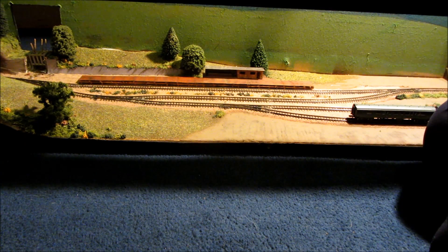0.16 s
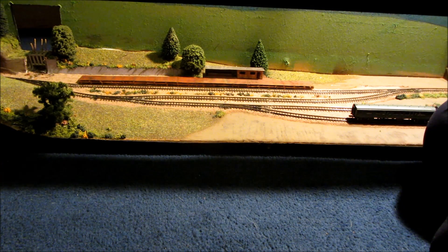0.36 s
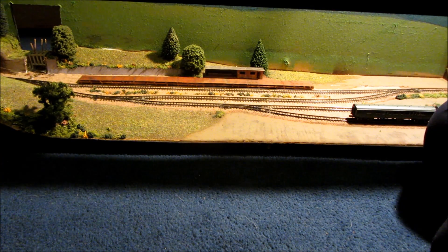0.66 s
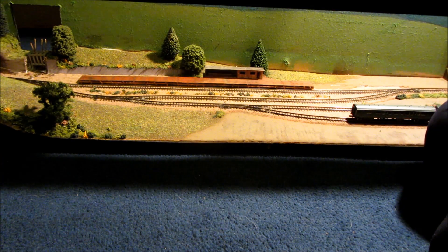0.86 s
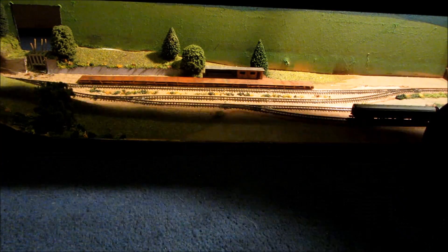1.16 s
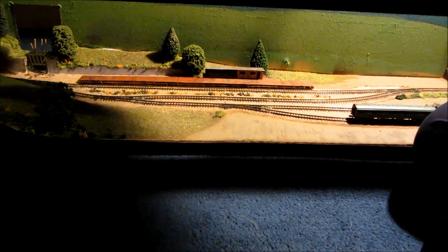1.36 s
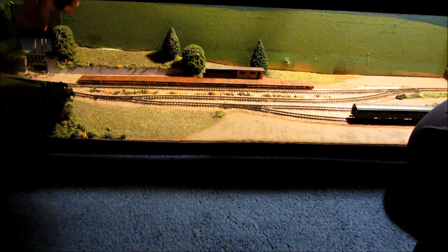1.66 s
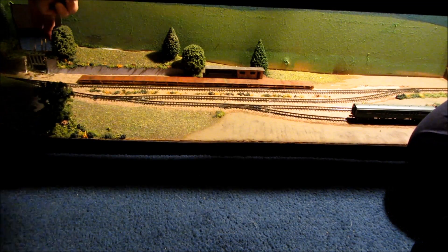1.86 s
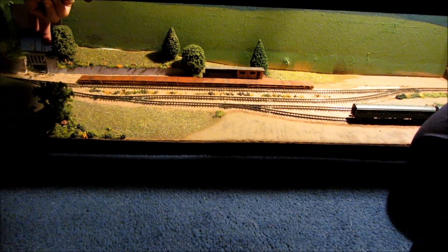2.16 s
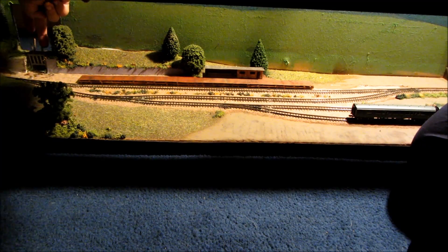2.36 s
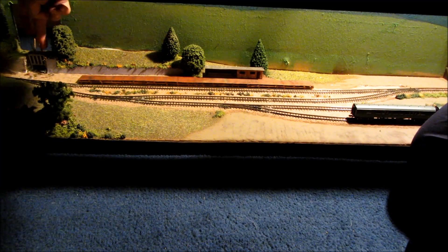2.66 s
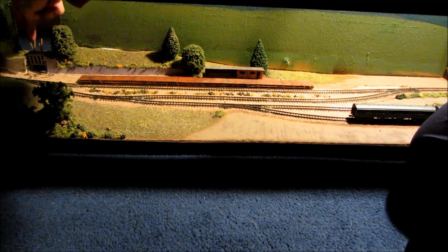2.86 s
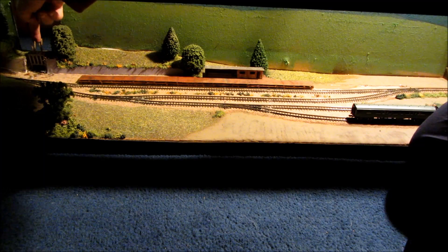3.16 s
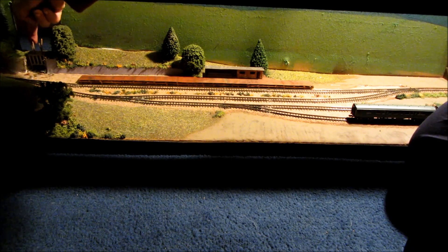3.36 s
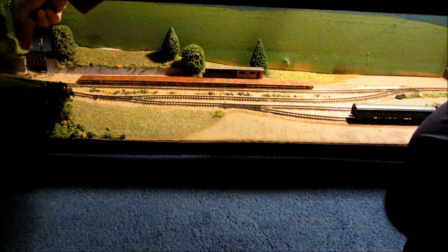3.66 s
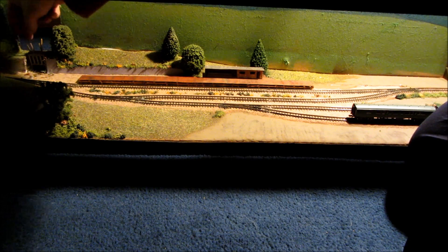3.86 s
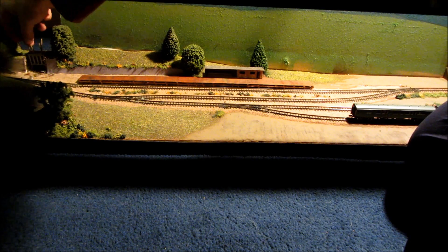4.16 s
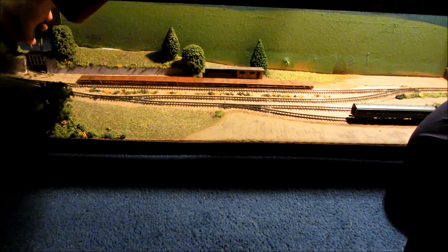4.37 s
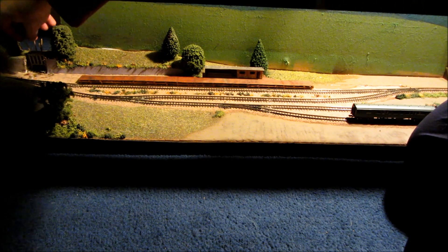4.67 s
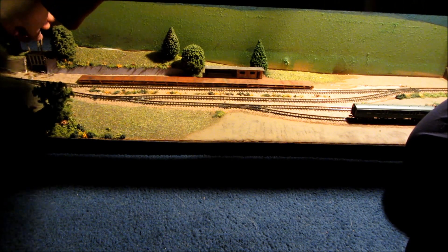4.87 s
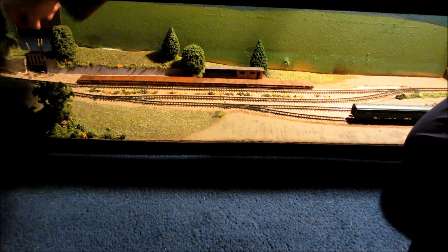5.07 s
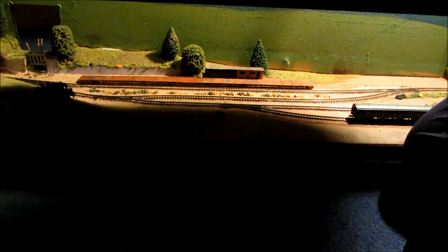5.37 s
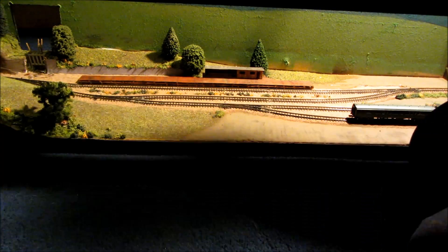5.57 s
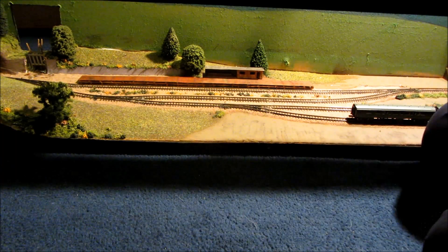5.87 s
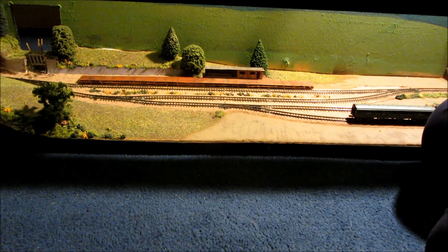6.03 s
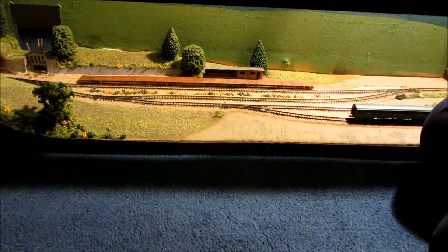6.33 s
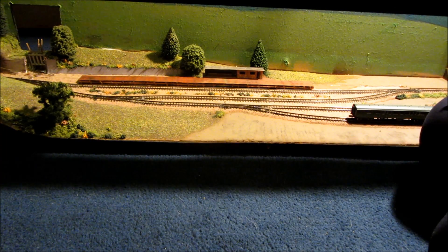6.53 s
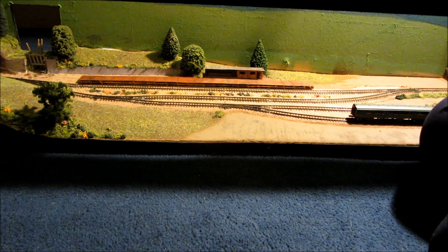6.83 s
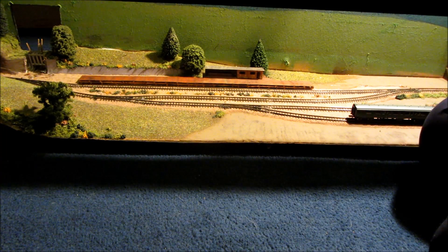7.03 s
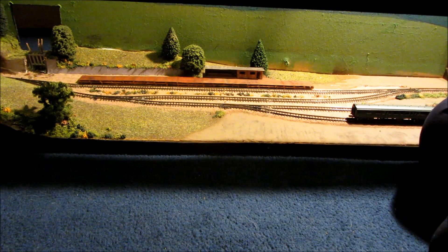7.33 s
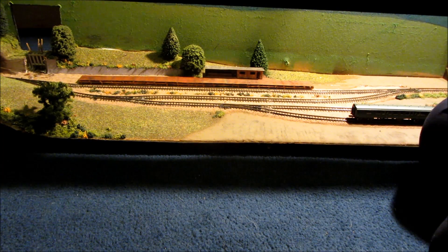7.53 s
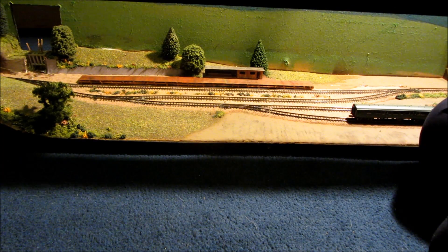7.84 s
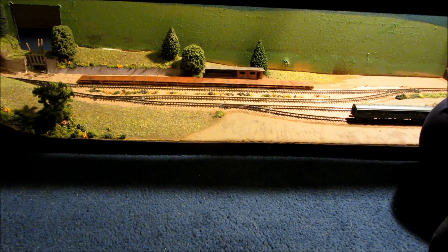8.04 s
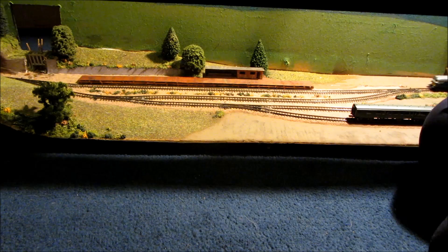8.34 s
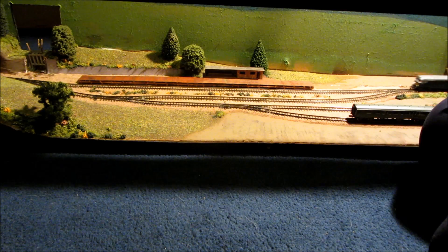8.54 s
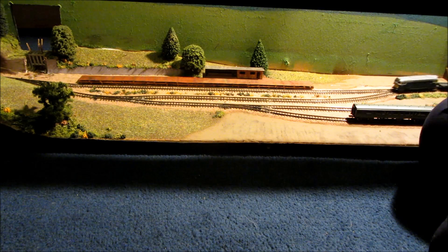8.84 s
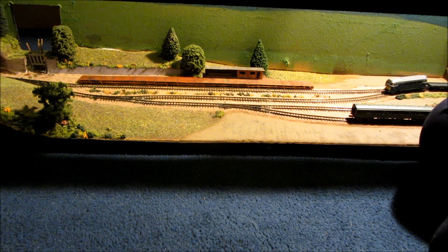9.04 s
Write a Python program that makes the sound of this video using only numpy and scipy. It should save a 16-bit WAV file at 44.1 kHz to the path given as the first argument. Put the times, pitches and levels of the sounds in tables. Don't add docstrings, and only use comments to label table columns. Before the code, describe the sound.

Close stereo pickup of a model railway on a hollow wooden board: brief whirring, clacking wheels slow and stop, followed by a dull knee bump and sleeve hiss. Irregular plastic clicks, squeaky finger rubs and light wooden knocks come next, then soft cloth movement. Near-silence with low hum is broken by a sharp double snap and chatter; finally the ticking motor and rough wheels return over the rail joints.

```python
import sys
import numpy as np
from scipy import signal
from scipy.fft import rfft, irfft, next_fast_len
from scipy.io import wavfile
from scipy.ndimage import uniform_filter1d

SR = 44100
rng = np.random.default_rng(int(sys.argv[2]) if len(sys.argv) > 2 else 0)


def log_audio(samples):
    frames = np.atleast_2d(samples).T
    limited = np.clip(frames, -1, 1)
    pcm = np.round(limited * 32767).astype(np.int16)
    wavfile.write(sys.argv[1], SR, pcm)


def voltage_ratio(decibels):
    exponent = np.asarray(decibels, float) / 20
    return 10 ** exponent


N = 405719

# f/Hz, density level/dB
AIR_SPECTRUM = [(20, -30), (60, -21.5), (95, -12), (125, -9.5), (155, -14), (190, -9), (230, -13),
                (400, -17.5), (700, -20), (1500, -27), (3300, -34), (4100, -39.5), (6000, -37),
                (9000, -43.5), (12500, -57), (15000, -55), (16400, -66)]
# f/Hz, rms level/dB
HUM_TONES = [
    (120, -46.5),
    (189, -59),
    (15735, -87.5),
]

# f/Hz, density level/dB
NYLON_SPECTRUM = [(3000, -30), (4200, -3), (5000, 3), (6200, 2.5), (8000, -2.5), (10000, -15), (13000, -24)]
# start t/s, peak t/s, end t/s, peak level/dB, crumpling over hiss/dB
SLEEVE_SLIDES = [
    (.49, 0.53, 0.59, -50, -1.5),
    (1.1, 1.368, 1.78, -70, 18),
    (1.004, 1.59, 2, -57, 7),
    (4.8, 5.2, 6.1, -70, 9),
    (5.607, 5.996, 6.26, -60.5, 7.5),
    (5.9, 6.205, 6.67, -60.5, 8),
]
# start t/s, peak t/s, end t/s, peak level/dB
TAUT_GLIDES = [
    (1.1, 1.5, 2.0, -64),
    (4.9, 5.197, 7, -70),
    (5.797, 5.92, 6.4, -59),
    (5.96, 5.99, 6.02, -52.5),
    (6.018, 6.047, 6.08, -56),
]
# t/s, thread rate f/Hz, level/dB
WEAVE_WHISTLE = [(1.18, 12000, -95), (1.3, 15500, -84), (1.6, 15800, -90), (1.66, 14600, -71),
                 (1.8, 11500, -87), (1.84, 10800, -99)]
# deepest swing t/s, peak level/dB, f/Hz, contact time/s
KNEE_BUMP = [
    (1.2575, -20.5, 174, 0.0031),
]

PLASTIC_HZ = [1400, 1580, 1987, 2150, 2450, 2858, 2978, 3313]
WOOD_HZ = [278, 420, 560, 627, 846, 904, 1266]
# f/Hz, density level/dB
CRACK_SPECTRUM = [(900, -12), (2000, 8), (3600, 3), (4600, 4), (5600, 2.5), (7000, 0.5), (8500, -12),
                  (11000, -18.5), (16400, -23)]
# f/Hz, density level/dB
FOOT_SPECTRUM = [(900, 2), (2000, 0), (3300, 3), (4600, -2.5), (6000, 2), (8500, -13), (11000, -24.5),
                 (16400, -40)]
# f/Hz, density level/dB
STEEL_SPECTRUM = [(900, 1), (2000, 6.5), (3600, -0.5), (5000, 5.5), (7000, 6), (9000, -0.5), (12000, -14.5),
                  (16400, -27)]

# start t/s, peak t/s, end t/s, peak level/dB
FINGER_RUBS = [
    (1.98, 2.014, 2.1, -50),
    (2.232, 2.247, 2.8, -51),
    (2.904, 2.95, 3.16, -51.5),
    (3.034, 3.104, 3.2, -42.5),
    (3.416, 3.57, 3.57, -41.5),
    (3.605, 3.653, 3.86, -37.5),
    (3.709, 3.71, 3.76, -32),
    (4.41, 4.413, 4.48, -40),
    (4.425, 4.45, 5.9, -60),
    (4.77, 4.903, 5.01, -43.5),
]
# f/Hz, width/Hz, level/dB
SQUEAK_MODES = [(1570, 120, 4), (2330, 67, 19), (3020, 160, 0)]
# t/s, plastic peak level/dB, plastic f/Hz, hardness/dB, breadth of the ring 0-1
PART_TICKS = [(2.0632, -42, 1570, -30, 0.37), (2.1136, -43, 2150, -17.5, 0.5),
              (2.2496, -22.5, 1580, -17.5, 0.52), (2.2652, -28.5, 3020, -18, 0.8),
              (2.2794, -33, 3000, -17, .45), (2.4636, -27.5, 1990, -11.5, 0.27),
              (2.4642, -28, 3000, -23, 0.2), (2.591, -21, 1880, -31, 0.28), (2.7311, -32, 1720, -24, 0.6),
              (2.973, -30.5, 2360, -28, 0.25), (3.141, -37, 2350, -36, 0.17), (3.242, -29, 2400, -32, .3),
              (3.258, -18, 2226, -27, 0.2), (3.2714, -20.5, 2200, -30, 0.24), (3.2722, -21, 1590, -30, .4),
              (3.2588, -26.5, 1490, -32, 0.5), (3.7135, -20, 2370, -19.5, 0.23),
              (3.7132, -23, 1570, -25, 0.14), (3.7152, -22.5, 2800, -23, 0.2),
              (3.8003, -23.5, 2335, -35, 0.55), (3.866, -27.5, 2330, -51, 0.21),
              (4.1066, -16.5, 1204, -23, .5), (4.108, -24, 3100, -29, 0.17), (4.2624, -45, 3020, -30, 0.1),
              (4.4669, -34, 2020, -12, 0.4), (4.4675, -32, 4700, -30, 0.2), (5.027, -27.5, 2150, -27, .45),
              (5.0275, -33, 3080, -31, 0.2)]
# t/s, board peak level/dB, board f/Hz, hardness/dB
PART_KNOCKS = [(2.137, -36, 357, -36), (2.141, -39.5, 400, -40), (2.2505, -38.5, 720, -30),
               (3.148, -48, 466, -40), (3.16, -46, 466, -40), (3.6275, -44, 595, -6),
               (3.6437, -47.5, 530, 3), (3.6538, -47, 696, 2.5), (3.713, -30, 533, -15),
               (3.7225, -37, 544, -30), (4.1075, -28.5, 480, -25), (3.7145, -29, 905, -23),
               (4.1066, -23.5, 820, -12), (4.1105, -29.5, 774, -20), (4.1169, -31, 700, -30),
               (4.4152, -37.5, 554, -10.5), (4.5496, -48, 517, -22), (4.8967, -33, 560, -10),
               (4.9045, -32, 424, -17.5), (5.0474, -48, 273, -14)]

# t/s, board peak level/dB, board f/Hz, hardness/dB
POINT_SLAMS = [
    (7.1142, -25.5, 1290, -12),
    (7.1488, -19.5, 1205, -3),
]
# t/s, plastic peak level/dB, plastic f/Hz, hardness/dB
POINT_BOUNCES = [(7.1244, -34.5, 2480, -1), (7.1584, -15.5, 2470, -24), (7.1657, -36, 1580, 2),
                 (7.1625, -25, 2460, -11), (7.169, -28, 910, -18), (7.1738, -24, 2500, -13),
                 (7.177, -31, 2700, -5), (7.1915, -30.5, 2420, -7), (7.196, -32, 1400, -13),
                 (7.209, -36, 2000, -12), (7.1854, -24, 2300, -13), (7.2004, -30, 2550, -14)]
# f/Hz, density level/dB
BLADE_SPECTRUM = [(150, -45), (250, -20), (474, -6), (600, -2), (914, -14), (1140, -4), (1760, -13),
                  (2390, -5.5), (3070, -13), (5930, -17), (14000, -43)]

# t/s, motor rate/(turns per s), nearness level/dB
TRAIN_RUNS = [
    [(0, 57, -43), (.17, 51, -43), (.3, 50.6, -45), (.4, 37.4, -48), (.5, 33, -51.5), (.6, 34, -73),
     (.66, 30, -88)],
    [(7.5, 24, -95), (7.56, 22, -53), (7.62, 26, -55.5), (7.85, 43, -49), (8.02, 55.8, -45.5),
     (8.58, 53.6, -40), (8.78, 51.2, -41.5), (8.96, 55.4, -47.5), (9.2, 49, -50.5)],
]
# f/Hz, width/Hz, level/dB
BOARD_MODES = [(284.5, 42, -2), (405, 49, 4.5), (529, 67, 2), (639, 16, -0.5), (790, 150, -4),
               (940, 135, -0.5), (1225, 400, -8.5), (1590, 33, -14)]
# f/Hz, width/Hz, level/dB
GEAR_MODES = [(1310, 400, -12), (1840, 66, -2.5), (2230, 130, -4), (3000, 240, 0.5), (3290, 164, -0.5),
              (3490, 185, -2)]
# f/Hz, density level/dB
WHEEL_SPECTRUM = [(3400, -28), (4200, -6), (5200, 3), (6500, 0), (7600, -0.5), (9000, -3), (10500, -0.5),
                  (12500, -15), (16400, -21)]
# f/Hz, width/Hz, level/dB
FLANGE_MODES = [(6510, 480, -2), (7770, 400, 8.5), (8900, 430, 3), (10500, 390, -19)]
# t/s, board peak level/dB, board f/Hz, hardness/dB
JOINT_THUMPS = [(.0174, -27.5, 271, -10), (.1119, -24, 406, -19), (.204, -27, 408, -27),
                (.221, -28, 420, -26), (.262, -25, 280, -23), (.29, -29, 278, -25), (.2394, -25, 265, -25),
                (.3549, -26, 370, -20), (7.817, -28, 287, -20), (7.889, -34, 401, -27),
                (7.9219, -26.5, 402, -22), (7.941, -23.5, 330, -35), (8.181, -33, 460, -27),
                (8.261, -30, 396, -28), (8.471, -27, 415, -24), (8.588, -24, 517, -22),
                (8.652, -22.5, 420, -22), (9.034, -24.5, 423, -27), (9.073, -28, 444, -25),
                (9.153, -28.5, 281, -28), (8.1329, -24, 564.5, -24), (8.2207, -31, 520, -20),
                (8.2876, -36, 405, -16), (8.3385, -26, 601, -13), (8.3534, -31, 544, -20),
                (8.4921, -20, 786, -11), (8.5405, -26, 798, -25), (8.6129, -22, 280, -8.5),
                (8.7568, -23.5, 792, -16), (8.8083, -30, 291.3, -12), (8.8588, -26, 497, -17),
                (8.883, -25, 808, -13), (8.8952, -22, 503, -15), (8.946, -23, 478, -11.5),
                (8.992, -26, 489, -19), (9.187, -27, 354, -11.5)]
# t/s, plastic peak level/dB, plastic f/Hz, hardness/dB, breadth where it differs
WAGON_CLACKS = [(.4856, -35.5, 2700, -13.5), (7.5, -32.5, 2490, -32), (7.66, -39, 3400, -15),
                (7.6999, -36.5, 3406, -14), (.0992, -34, 3300, -14), (0.3, -39, 2300, -17),
                (.5322, -44, 3250, -8), (7.9826, -32, 3003, -18), (8.5, -38.5, 3000, -4),
                (8.1545, -34, 2908, -14), (8.1785, -42, 3300, -14), (8.1989, -33, 3000, -9),
                (8.5, -33, 2000, -15), (9, -38, 2990, -6), (8.381, -29, 2900, -20), (8, -33, 3000, -9),
                (9, -28, 2930, -11), (8.5, -28, 2000, -12), (8.731, -32, 2200, -4), (8.7425, -34, 1590, -5),
                (9.0206, -36, 2392, -9), (9.0925, -28, 2000, -18), (8, -32, 2960, -15),
                (7.5, -28, 2882, -18), (8.7216, -23, 3020, -9), (8.9194, -26, 2047, -11.5),
                (9.0342, -18, 2050, -21.5, -1), (9.0346, -21, 1450, -27, .5), (9.0753, -31, 1400, -5),
                (9.1188, -24.5, 2220, -13.5)]

AIR_DB = -51
ROOM_T60_S, ROOM_DB, ROOM_TOP_HZ = 0.2, -15.5, 3800
TOP_HZ = 15830
BEAT, BEAT_HZ = 0.45, 90.5
TRAVEL_DB, STOP_DB, CHATTER_T60_S = -35.5, -25, 0.3
FULL_TURNS_PER_S = 53.2
WANDER_DB = 1.6
RUMBLE_DB, RUMBLE_POWER = 7.5, 2.64
HISS_DB, HISS_POWER = -3, 0.35
RATTLE_PER_S, RATTLE_DB = 180, -7.5
TEETH, TEETH_SHARE = 4, 0.54
t = np.arange(N) / SR
AGE = np.arange(SR // 20) / SR


def unit(x):
    return x / np.sqrt(np.mean(x ** 2))


def band(x, lo_hz, hi_hz):
    return signal.sosfilt(signal.butter(3, [lo_hz, hi_hz], "band", fs=SR, output="sos"), x)


def resonate(x, modes):
    out = 0
    for k, (hz, width, db) in enumerate(modes):
        out = out + (-1) ** k * voltage_ratio(db) * signal.lfilter(*signal.iirpeak(hz, hz / width, SR), x)
    return out


def coloured(spectrum):
    hz, db = np.transpose(spectrum)
    size = next_fast_len(N, True)
    bins = np.fft.rfftfreq(size, 1 / SR) + 1
    gain = voltage_ratio(np.interp(np.log(bins), np.log(hz), db, -90, -90))
    return unit(irfft(rfft(rng.standard_normal(size)) * gain, size)[:N])


def walk(rate):
    k = int(SR / rate)
    return 1.1 * uniform_filter1d(np.repeat(rng.standard_normal(N // k + 1), k), k)[:N]


def grit(per_s, spread_db):
    hits = rng.random(N) < per_s / SR
    return unit(hits * rng.standard_normal(N) * voltage_ratio(spread_db * rng.standard_normal(N)))


def stroke(row, depth_db, power):
    start, peak, end, db = row[:4]
    gain, span = np.zeros(N), slice(int(start * SR), int(end * SR))
    distance = np.abs(np.interp(t[span], [start, peak, end], [-1, 0, 1]))
    gain[span] = voltage_ratio(db - depth_db * distance ** power)
    return gain


def ring(hz, t60, chance, rise_s, centre_hz, spread):
    hz = np.array(hz)[:, None]
    a, b = chance[:len(hz)].T[:, :, None]
    db = -6 * (np.log(hz / centre_hz) / spread) ** 2 + 3.05 * a
    flutter = 1 + BEAT * np.cos(2 * np.pi * BEAT_HZ * (1 + abs(b)) * AGE + a)
    modes = voltage_ratio(db) * flutter * np.sin(2 * np.pi * hz * (1 + 0.02 * b) * AGE + 3 * b)
    y = np.sum(modes, axis=0) * 1000 ** (-AGE / t60) * (1 - np.exp(-(AGE / rise_s) ** 2))
    return y / np.abs(y).max()


def clicks(events, t60, wood_db, crack_db, contact=CRACK_SPECTRUM):
    out, noise = np.zeros(N + SR), np.tile(coloured(contact), 2)
    fade = 1000 ** (-AGE / (0.32 * t60)) + 0.074 * 1000 ** (-AGE / (1.0 * t60))
    fade = fade * np.minimum(AGE / 0.00043, 1)
    for s, db, low_db, high_db, hz, wood_hz, *breadth in events:
        chance, i = rng.standard_normal((17, 2)), int(s * SR)
        chance[[0, 9]] = 1.5, 0
        spread = max(breadth[0], .08) if breadth else 0.45
        plastic = ring([hz] + PLASTIC_HZ, 0.69 * t60, chance, 0.00076, hz, spread)
        wood = ring([wood_hz] + WOOD_HZ, 0.81 * t60, chance[9:], 0.00049, wood_hz, spread=0.77)
        crack = noise[i:i + len(AGE)] * fade
        blow = voltage_ratio(db) * plastic + voltage_ratio(low_db + wood_db) * wood + voltage_ratio(high_db + crack_db) * crack
        out[i:i + len(AGE)] += blow
    return band(out[:N], 96, 16400)


def on_plastic(rows, board_db, board_hz):
    return [(s, db, db + board_db, db + hard_db, hz, board_hz, *breadth) for s, db, hz, hard_db, *breadth in rows]


def on_board(rows, plastic_db, share, plastic_hz):
    return [(s, db + plastic_db + share * hard_db, db, db + hard_db, plastic_hz, hz) for s, db, hz, hard_db in rows]


def place(x, pan_db, lag):
    left = voltage_ratio(pan_db / 2) * np.roll(x, max(lag, 0))
    right = voltage_ratio(-pan_db / 2) * np.roll(x, max(-lag, 0))
    return np.array([left, right])


def shifting(pair, paths, rate):
    facing = voltage_ratio([8 * walk(rate) for _ in paths])
    facing = facing / np.linalg.norm(facing, axis=0)
    return sum(signal.oaconvolve(pair * f, p, axes=1)[:, :N] for f, p in zip(facing, paths))


def room_tone():
    shared = coloured(AIR_SPECTRUM)
    air = np.array([0.98 * coloured(AIR_SPECTRUM) + 0.39 * side * shared for side in (1, -1)])
    air = air / np.std(band(air[0], 130, 16000)) * voltage_ratio(AIR_DB + 3.0)
    hum = []
    for lead in (0, 1.1):
        hum.append(sum(voltage_ratio(db + 0.5 + 0.12 * walk(13.0)) * np.sin(2 * np.pi * hz * t + lead)
                       for hz, db in HUM_TONES))
    return air + np.array(hum)


def echoes(x):
    s = np.arange(SR // 3) / SR
    noise = rng.standard_normal((2, 3, len(s)))
    tail = noise[:, :2] + 0.28 * band(noise[:, 2:], 67, 1150) * 3
    tail = tail * 1000 ** (-s / ROOM_T60_S) * (s > .004)
    tail = signal.lfilter(*signal.butter(1, ROOM_TOP_HZ, fs=SR), tail)
    return shifting(x[None], tail / np.sqrt(np.sum(tail ** 2) / 4), 6)


def edges(pair):
    scatter = rng.standard_normal((2, 2, 700)) * np.exp(-np.arange(700) / 110.)
    paths = np.diff(scatter, prepend=0)
    return pair + 1.05 * shifting(pair, paths / np.linalg.norm(paths, axis=2, keepdims=True), 9)


def sleeve():
    s, hz, db = np.transpose(WEAVE_WHISTLE)
    thread_hz = np.interp(t, s, hz) * (1 + .004 * walk(300))
    whistle = voltage_ratio(np.interp(t, s, db, -200, -200)) * np.sin(2 * np.pi * np.cumsum(thread_hz) / SR)
    hiss = np.array([1.54 * coloured(NYLON_SPECTRUM) for _ in range(2)]) + 0.95 * coloured(NYLON_SPECTRUM)
    crumple = rng.standard_normal((2, N)) + rng.standard_normal(N)
    folds = unit(band(crumple, 285, 860) + 0.52 * band(crumple, 810, 3120))
    threads = rng.standard_normal((2, N)) * voltage_ratio(1.7 * walk(50))
    sheen = unit(band(threads, 7550, 11500) + 0.44 * band(threads, 10300, 14700))
    moves = np.array([stroke(r, depth_db=26.5, power=1.44) for r in SLEEVE_SLIDES])
    slides = moves.sum(axis=0) * hiss + voltage_ratio([r[4] for r in SLEEVE_SLIDES]) @ moves * folds
    glides = sum(stroke(r, depth_db=13, power=1.1) for r in TAUT_GLIDES) * sheen
    return voltage_ratio(0.74 * walk(60)) * (slides + glides) + whistle


def bump():
    (s, db, hz, contact), = KNEE_BUMP
    age = t - s
    scuff = band(rng.standard_normal(N), 320, 1500) * np.exp(-((age + contact) / 0.0012) ** 2)
    swing = np.exp(-(age / contact) ** 4 / 4)
    faint = 0.21 * (age > 0) * np.exp(-np.abs(age) / 0.023)
    return voltage_ratio(db) * (0.93 * scuff - np.cos(2 * np.pi * hz * age) * (swing + faint))


def hands():
    skin = grit(4000, spread_db=2.5)
    rub = unit(resonate(skin, [(hz, 140, 0.) for hz in PLASTIC_HZ + WOOD_HZ[2::2]]))
    rub = unit(rub + 0.34 * unit(resonate(skin, SQUEAK_MODES)))
    ticks = clicks(on_plastic(PART_TICKS, board_db=-23, board_hz=820), t60=0.04, wood_db=10.0, crack_db=15)
    pushes = on_board(PART_KNOCKS, plastic_db=7.0, share=0.44, plastic_hz=2127)
    knocks = clicks(pushes, t60=0.032, wood_db=8.5, crack_db=17.5, contact=FOOT_SPECTRUM)
    return ticks + knocks + voltage_ratio(-4.5) * sum(stroke(r, depth_db=31.5, power=1.2) for r in FINGER_RUBS) * rub


def points():
    chatter = coloured(BLADE_SPECTRUM) * voltage_ratio(2.6 * walk(400))
    (pull, *_), (stop, *_) = POINT_SLAMS
    travel = voltage_ratio(TRAVEL_DB) * (t > pull)
    dying = voltage_ratio(STOP_DB) * 1000 ** (-np.abs(t - stop) / CHATTER_T60_S)
    blows = on_board(POINT_SLAMS, plastic_db=-8, share=.4, plastic_hz=2000)
    blows = blows + on_plastic(POINT_BOUNCES, board_db=-9.5, board_hz=700)
    return clicks(blows, t60=0.028, wood_db=4, crack_db=13.0) + np.where(t < stop, travel, dying) * chatter


def train():
    s, turns, near_db = np.concatenate(TRAIN_RUNS).T
    speed, near = np.interp(t, s, turns), voltage_ratio(np.interp(t, s, near_db))
    pace = speed / FULL_TURNS_PER_S
    turn = np.cumsum(speed * (1 + 0.015 * walk(23))) / SR
    bind = np.exp(-(turn % 1) / 0.81) * voltage_ratio(0.55 * rng.standard_normal(N // 400)[turn.astype(int)])
    bind = bind + TEETH_SHARE * np.exp(-(turn * TEETH % 1) / 0.4)
    rough = grit(2500, spread_db=2.5) * voltage_ratio(0.6 * walk(40))

    drive, modes = rough * (0.63 + 1.26 * bind), 0
    for k, mode in enumerate(BOARD_MODES):
        modes = modes + (-1) ** k * voltage_ratio(WANDER_DB * walk(12)) * resonate(drive, [mode])
    board = band(modes + 0.19 * rough, 134, 2300)
    gears = resonate(grit(1500, spread_db=1) * (0.44 + 0.98 * bind), GEAR_MODES)
    gears = gears + 0.32 * band(rough, 1640, 5200)

    axles = coloured(WHEEL_SPECTRUM)
    left = voltage_ratio(-3) * (.6 * np.roll(axles, 3) + coloured(WHEEL_SPECTRUM))
    hiss = np.array([left, .6 * axles + coloured(WHEEL_SPECTRUM)])
    hiss = (hiss + 1.28 * resonate(hiss, FLANGE_MODES)) * (0.73 + 0.91 * bind) * voltage_ratio(1.94 * walk(60))
    hits = np.abs(grit(RATTLE_PER_S, spread_db=1.5))
    rattle = coloured(STEEL_SPECTRUM) * signal.lfilter([1], [1, -np.exp(-1 / (0.00075 * SR))], hits)

    rolling = voltage_ratio(RUMBLE_DB) * pace ** RUMBLE_POWER * unit(board) + voltage_ratio(1.5) * unit(gears)
    rolling = near * (rolling + voltage_ratio(RATTLE_DB) * pace * unit(rattle))
    joints = on_board(JOINT_THUMPS, plastic_db=-5.5, share=.05, plastic_hz=2274)
    joints = joints + on_plastic(WAGON_CLACKS, board_db=-8.5, board_hz=420)
    blows = clicks(joints, t60=0.036, wood_db=1.5, crack_db=12.5, contact=STEEL_SPECTRUM)
    return rolling + voltage_ratio(-1.0) * blows, near * voltage_ratio(HISS_DB) * pace ** HISS_POWER * unit(hiss)


def scene():
    (rolling, hiss), fingers = train(), hands()
    snap, knock = points(), bump()
    direct = place(rolling, -4, lag=3) + place(fingers, .8, lag=-4)
    direct = direct + place(snap, -2, lag=4) + place(knock, -.5, lag=2)
    wet = voltage_ratio(ROOM_DB) * echoes(fingers + voltage_ratio(3.0) * snap + voltage_ratio(3.5) * rolling + knock)
    return edges(direct) + hiss + wet + sleeve() + room_tone()


def top_cut(x):
    return signal.sosfilt(signal.butter(12, 16510, fs=SR, output="sos"), x)


def record(dry):
    rounded = np.tanh(1.598 * dry) / 1.604
    mix = signal.sosfilt(signal.ellip(8, .2, 60, TOP_HZ, fs=SR, output="sos"), rounded)
    return top_cut(mix)


dry = scene()
out = record(dry)
log_audio(out)
```